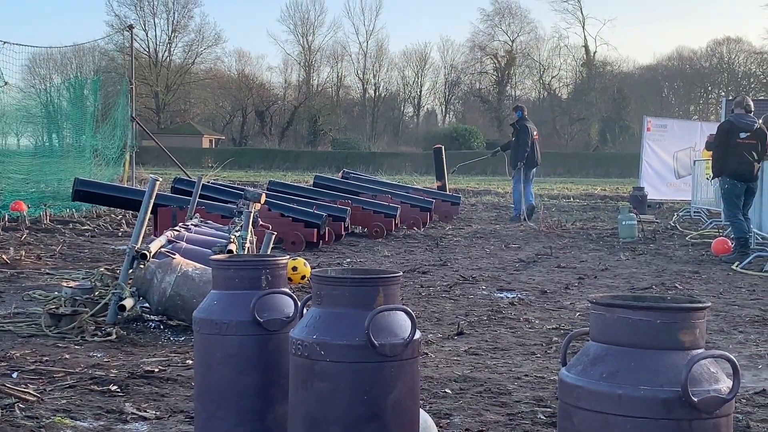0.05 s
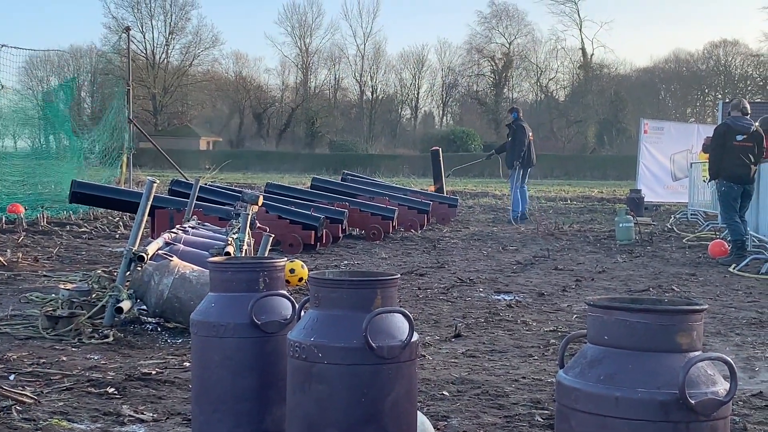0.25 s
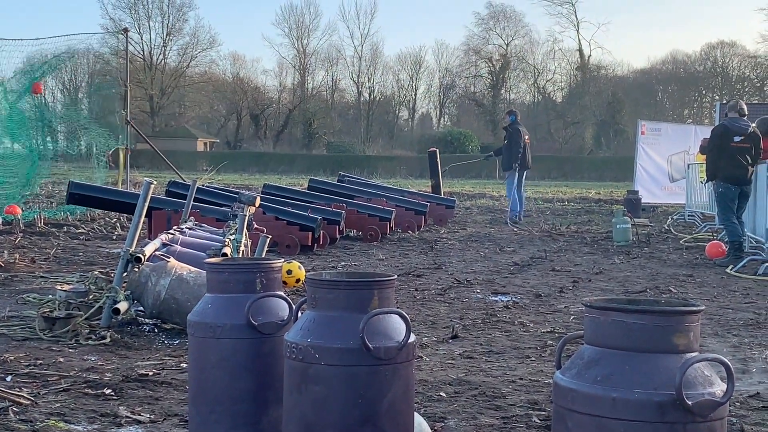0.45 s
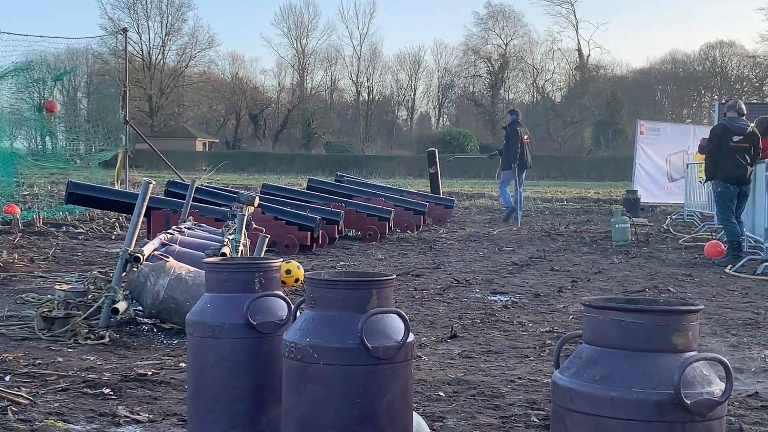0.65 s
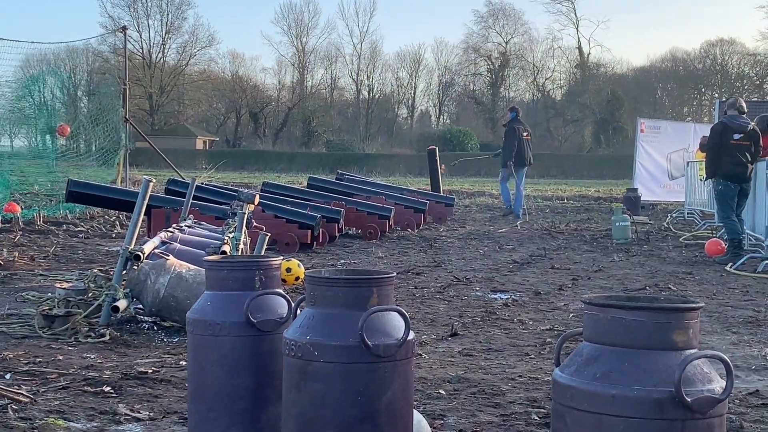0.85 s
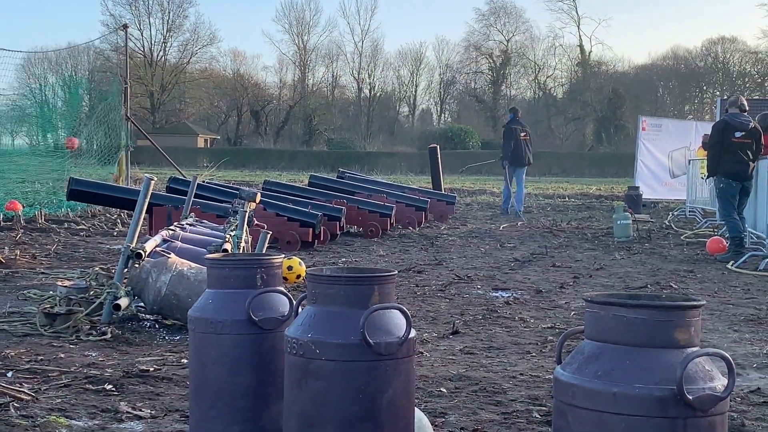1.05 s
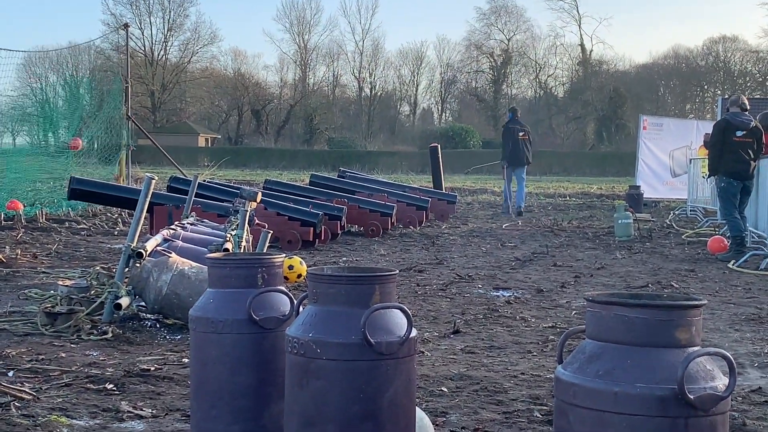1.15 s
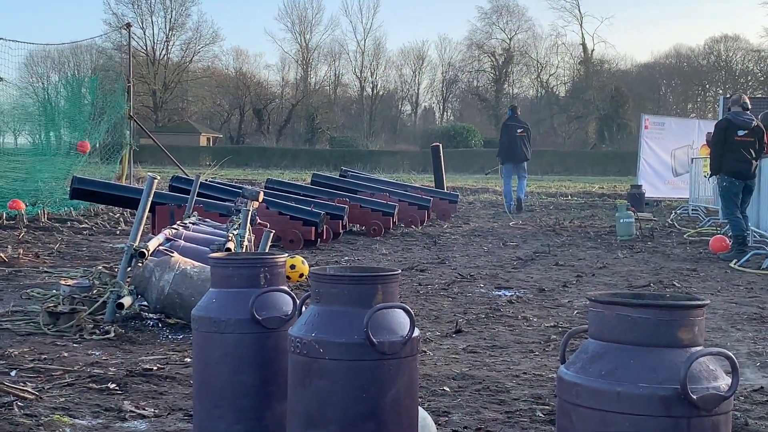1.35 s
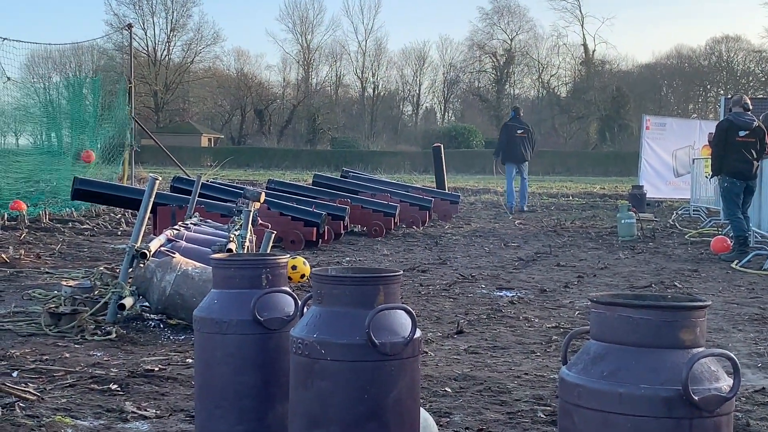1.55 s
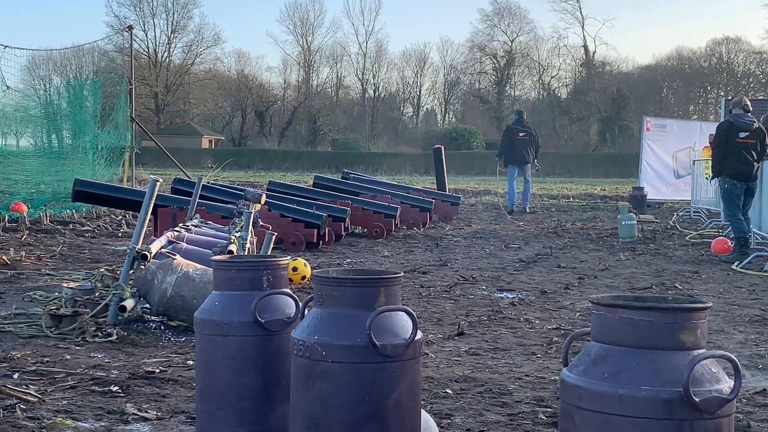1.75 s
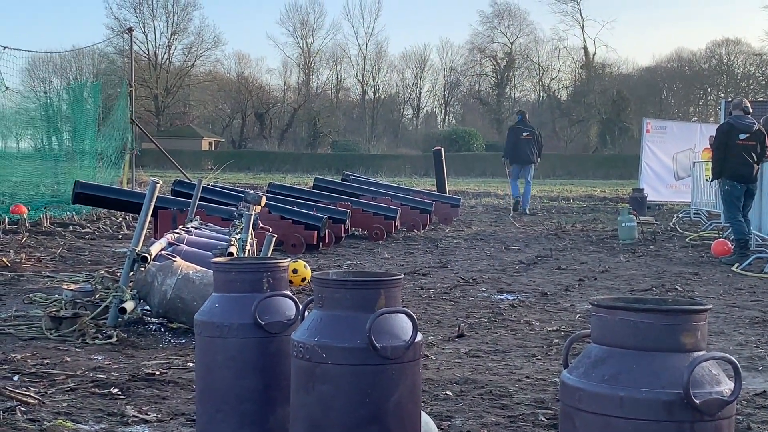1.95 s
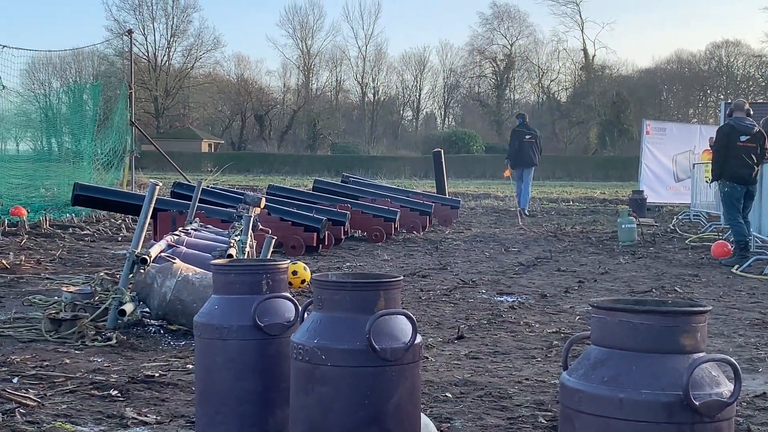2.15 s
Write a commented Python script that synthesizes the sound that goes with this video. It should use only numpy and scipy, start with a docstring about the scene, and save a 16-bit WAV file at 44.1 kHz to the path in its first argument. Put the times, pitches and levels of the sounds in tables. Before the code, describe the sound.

One sharp, deep carbide cannon blast, followed by echoes and a fading low rumble.

```python
"""A carbide cannon in an open field, heard on a stereo pair. A distant bird whistles faintly; then a
brief swell runs into a sharp crack, a boom that sweeps down and a short ring of the steel barrel. The
blast overloads the recorder. Nearby objects, then far walls, throw the boom back, one with a hollow
knock, while stands of bare trees scatter the crack into a hiss. A low rumble rolls away, and the bird
whistles once more over the low background of the field."""
import sys
import numpy as np
from scipy import signal
from scipy.fft import rfft, irfft, next_fast_len
from scipy.io import wavfile
from scipy.ndimage import uniform_filter1d, map_coordinates

SR = 44100
rng = np.random.default_rng(int(sys.argv[2]) if len(sys.argv) > 2 else 0)


def master_out(mix):
    """Clip the mix to full scale and print it as 16-bit PCM to the path in sys.argv[1]."""
    frames = np.transpose(np.atleast_2d(mix))
    ceiling = np.clip(frames, -1, 1)
    pcm = np.round(ceiling * 32767).astype(np.int16)
    wavfile.write(sys.argv[1], SR, pcm)


N = 97020
SHOT_S = .2168

# Spectrum of the muzzle blast (frequency [Hz], relative level [dB])
BLAST_SPECTRUM = [(20, -51), (45, -9.5), (110, 9.5), (190, 5.5), (400, -7.5), (750, -15), (1400, -20.5),
                  (3000, -48.5), (8000, -66.5)]

def blast_wave(start, cut_hz=None, bass_lag_s=.0117, knee_hz=132.5):
    """One pressure pulse whose bass trails behind the front; echoes lose the top above cut_hz."""
    hz = np.fft.rfftfreq(2 * N, 1 / SR)
    trail = bass_lag_s * knee_hz * np.arctan(hz / knee_hz)
    wave = causal(amp(along(BLAST_SPECTRUM, hz))) * np.exp(-2j * np.pi * (trail + hz * start))
    dull = 1 if cut_hz is None else causal((1 + (hz / cut_hz) ** 4) ** -.5)
    return irfft(wave * dull)[:N] / np.abs(irfft(wave)).max()


# Spectrum of the swell just ahead of the crack (frequency [Hz], relative level [dB])
SWELL_SPECTRUM = [(50, -18.5), (150, -3.5), (450, 2.5), (900, -9.5), (2000, -15.5), (7000, -11.5),
                  (9000, -31.5), (16000, -47.5)]
# Modes of the steel barrel (frequency [Hz], level [dB], t60 [s])
BARREL_MODES = [(238.2, -14.5, 0.41), (394.8, -8.5, 0.15), (447, -16.5, .27), (500.4, -19.5, 0.18),
                (534, -22, .17), (632, -27.5, .22), (708.5, -32, .21), (892, -18, 0.15),
                (1125, -25.5, 0.16), (1260, -27.5, .13), (1354, -24, 0.046), (1572, -35, .13)]

def cannon(swell_db_per_s=1899, boom_delay_s=.002, mic_spread_s=.00033):
    """A brief swell leads into the crack; then come the boom and the ring of the barrel."""
    t, lead = since(SHOT_S), np.maximum(SHOT_S - since(0), 0)
    swell = (lead > 0) * amp(-17 - swell_db_per_s * lead) * rush(SWELL_SPECTRUM, YARD_LIKENESS)
    boom = placed(amp(-3) * blast_wave(SHOT_S + boom_delay_s), lag_ms=1)
    ring = 0
    for hz, db, t60 in BARREL_MODES:
        arrival = mic_spread_s * rng.standard_normal((2, 1))
        ring = ring + amp(db - 60 * t / t60) * np.sin(2 * np.pi * hz * (t - arrival))
    return swell + boom + panned(ring, db=3) * attack(t, rise_s=.0027)


# The direct crack and its returns (delay [s], relative level [dB])
CRACK_ARRIVALS = [(0, 1.5), (.0056, -11), (.0088, -11), (0.02, -12), (0.389, -32.5)]
# Spectrum of the shock front (frequency [Hz], relative level [dB])
CRACK_SPECTRUM = [(300, 1.5), (1100, 1.5), (2200, -4.5), (4000, -5), (6500, -7), (8800, -10.5),
                  (11000, -10), (14000, -19), (16000, -19)]
# The crack across the pair (frequency [Hz], left-right likeness [0-1])
CRACK_LIKENESS = [(300, 0.778), (10000, 0.2)]

def cracks(t60=.00624):
    """The shock front slaps the microphones, then comes back from hard surfaces."""
    total = 0
    for delay, db in CRACK_ARRIVALS:
        t = since(SHOT_S + delay)
        slap = (t > 0) * amp(db - 4.5 - 60 * t / t60)
        total = total + slap * rush(CRACK_SPECTRUM, CRACK_LIKENESS, lag_ms=-.15)
    return total


# Spectrum of the close scatter (frequency [Hz], relative level [dB])
YARD_SPECTRUM = [(25, -26.5), (60, -7), (150, -4), (330, -6.5), (550, -10.5), (800, -14), (1400, -20.5),
                 (2300, -25), (4000, -27), (6800, -28), (8600, -35.5), (11000, -25), (16000, -40)]
# Its decay (frequency [Hz], t60 [s])
YARD_DECAY = [(60, 0.28), (300, 0.54), (1000, 0.17), (4000, 0.25), (10000, 0.21), (16000, 0.13)]
# Close sound across the pair (frequency [Hz], left-right likeness [0-1])
YARD_LIKENESS = [(60, 0.78), (200, .9), (600, 0.13), (1500, .2), (6000, 0.054)]

def yard():
    """Cannons and churns close by throw dense scatter right behind the blast."""
    wash = fading(rush(YARD_SPECTRUM, YARD_LIKENESS), lambda hz: 60 / along(YARD_DECAY, hz))
    return amp(-14) * wash * attack(since(SHOT_S), rise_s=.0027)


# Returns of the boom, near to far (time [s], gain [dB], low-pass [Hz], right microphone lag [ms])
BOOM_ECHOES = [(0.2203, -5, 470, -0.18), (0.23, 7, 55.6, 0.029), (0.2351, -18, 400, .1),
               (0.2551, -13, 266, 0.12), (0.268, -22, 354, 0.06), (0.2795, -10.5, 344, -0.64),
               (.291, -4.5, 403, -0.46), (0.2999, -5, 470, -0.76), (0.3179, 6, 74, -0.84),
               (0.3301, 8.3, 36, -0.88), (0.3774, -16.5, 237, -0.81), (.3992, -4.5, 84, -0.24),
               (.527, -21, 202, -0.54), (0.606, -4, 72.5, -0.15), (0.6146, -9, 78, -0.53),
               (.659, -23, 295, -0.096), (0.747, -21.5, 106, -.3), (0.84, -28, 110.6, -0.34),
               (.929, -29.5, 280, 0.53), (0.951, -32.5, 455, 0.54), (.973, -34, 420, .24),
               (1.05, -26.5, 96, -0.15), (1.092, -29.5, 204, -0.44), (1.123, -28, 160, -0.5),
               (1.189, -29.5, 170, -0.12), (1.227, -28.5, 150, -0.017), (1.368, -25, 74, -0.031),
               (1.396, -29.5, 98.4, 0), (1.525, -28, 106, .21)]

def echoes():
    """Nearby objects and far walls return dull copies of the boom, each from its own side."""
    return sum(placed(amp(db) * blast_wave(s, cut_hz), lag) for s, db, cut_hz, lag in BOOM_ECHOES)


# Modes of the far knock (frequency [Hz], level [dB], t60 [s])
KNOCK_MODES = [(474, -23.5, 0.033), (896, -24.5, 0.042), (1370, -42, 0.072)]

def knock(start_s=.605):
    """A short, hollow ring arrives with the strongest far echo."""
    t = since(start_s)
    ring = sum(amp(db - 60 * t / t60) * np.sin(2 * np.pi * hz * t) for hz, db, t60 in KNOCK_MODES)
    return placed(ring * attack(t, rise_s=.004), lag_ms=-.21)


# Fences, hedges and trees, near to far
# (time [s], rise [s], hold [s], t60 [s], level [dB], trunk gain [dB], right microphone lag [ms])
STANDS = [(0.283, 0.01, 0.019, 0.2, -35, 11, -0.42), (0.356, 0.021, 0.067, 0.44, -53, 11.5, -0.285),
          (0.484, 0.017, 0.185, 0.47, -48, 4, -0.29), (0.599, 0.0014, 0.004, 0.12, -42, 3.5, 0.07),
          (0.606, 0.029, 0.049, 0.17, -46.5, -7.5, -0.29), (.72, 0.055, 0.11, 0.33, -65.5, 9, -0.17),
          (0.897, 0.038, 0.017, 0.9, -44, 2.5, 0.45), (.92, 0.12, 0.23, 2.95, -50.5, -2, 0.4),
          (1.33, 0.054, 0.17, 0.42, -57, -8.5, 0.28)]
# Hiss off the twigs (frequency [Hz], relative level [dB])
TWIG_SPECTRUM = [(200, -35), (700, -2.5), (1300, 4), (2100, 3), (4000, -1), (7000, -6.5), (8600, -17),
                 (11000, -5), (13000, -34), (16000, -32)]
# Low-mid body off the trunks (frequency [Hz], relative level [dB])
TRUNK_SPECTRUM = [(60, -13.5), (150, 2.5), (230, -5), (330, -6), (500, -11), (900, -13.5), (2000, -39)]
# Distant sound across the pair (frequency [Hz], left-right likeness [0-1])
FIELD_LIKENESS = [(60, 1), (200, 0.87), (500, 0.74), (1800, 0.57), (4000, 0.128), (9000, 0.44)]

def thickets(air_db_per_s=12.5):
    """Each stand returns a swell of hiss; the air dulls the farther ones."""
    total = 0
    for start, rise, hold, t60, db, trunk_db, lag in STANDS:
        swell = np.minimum(since(start) / rise, 1) * amp(db - 60 * since(start + rise + hold) / t60)
        twigs = amp(1.5) * rush(TWIG_SPECTRUM, FIELD_LIKENESS, lag)
        trunks = amp(trunk_db) * rush(TRUNK_SPECTRUM, FIELD_LIKENESS, lag)
        total = total + swell * (twigs + trunks)
    return fading(total, lambda hz: air_db_per_s * (hz / 4000) ** 1.12)


# Course of the far rumble (time [s], relative level [dB])
RUMBLE_LEVELS = [(.36, -26), (.5, -29), (.59, -31.5), (.69, -28.5), (.881, -41.5), (1.001, -43),
                 (1.252, -40.5), (1.601, -43), (1.9, -51), (2.2, -56)]
# Its spectrum (frequency [Hz], relative level [dB])
RUMBLE_SPECTRUM = [(20, -38.5), (40, -17), (65, 3.5), (130, -3.5), (200, -8.5), (320, -26.5), (700, -37.5),
                   (2000, -79)]
# Its extra loss on the way (frequency [Hz], loss [dB/s])
RUMBLE_LOSS = [(70, 0.6), (130, 2.5), (250, 9.5)]

def rumble():
    """Countless far echoes merge into an even, low roll that deepens as it travels."""
    times, level_db = np.transpose(RUMBLE_LEVELS)
    roll = rush(RUMBLE_SPECTRUM, FIELD_LIKENESS, lag_ms=-.32)
    power = np.abs(uniform_filter1d(np.mean(roll ** 2, axis=0), size=3000))
    even = roll / np.sqrt(power + 1e-6)
    deepening = fading(even, lambda hz: along(RUMBLE_LOSS, hz), patchy_db=.2)
    onset = np.minimum(since(SHOT_S) / (times[0] - SHOT_S), 1) ** 2
    return deepening * onset * amp(np.interp(since(0), times, level_db) + 1)


# Whistles of a distant bird (time [s], length [s], pitch [Hz], level [dB])
BIRD_NOTES = [(.02, .2, 6600, -90), (1.768, .25, 6350, -91)]

def bird(waver_hz=150, wavers_per_s=400):
    """Faint, high notes from far off, each wavering around one pitch."""
    waver = map_coordinates(rng.standard_normal(N), [since(0) * wavers_per_s])
    total = 0
    for start, length, hz, db in BIRD_NOTES:
        arch = np.abs(np.sin(np.pi * np.minimum(since(start) / length, 1)))
        total = total + amp(db) * arch * np.sin(2 * np.pi * np.cumsum(hz + waver_hz * waver) / SR)
    return total


# Background of the open field (frequency [Hz], relative level [dB])
AMBIENCE_SPECTRUM = [(20, -21), (55, 5), (130, -1.5), (250, -13), (450, -13.5), (650, -22.5), (1200, -23.5),
                     (2000, -35), (3100, -29), (5000, -49.5), (8000, -57), (11000, -57.5), (16000, -72)]

def ambience():
    """A steady, low rush around the microphones."""
    return amp(-57) * rush(AMBIENCE_SPECTRUM, FIELD_LIKENESS)


def amp(db):
    """Decibels to gain."""
    return 10 ** (np.asarray(db) / 20)


def unit(x):
    """Scale to rms 1."""
    return x / np.sqrt(np.mean(x ** 2) + 1e-20)


def along(points, hz):
    """Read (frequency, value) points on a log axis."""
    freqs, values = np.transpose(points)
    return np.interp(np.log(hz + 1), np.log(freqs + 1), values)


def since(start):
    """Seconds since start, zero before it."""
    return np.maximum(np.arange(N) / SR - start, 0)


def attack(t, rise_s):
    """An exponential rise from 0 to 1."""
    return 1 - np.exp(-t / rise_s)


def filtered(x, response):
    """Pass x through a complex response of frequency."""
    size = next_fast_len(N + SR // 2)
    return irfft(rfft(x, size) * response(np.fft.rfftfreq(size, 1 / SR)), size)[..., :N]


def causal(gain):
    """The minimum-phase response with this gain."""
    cepstrum = irfft(np.log(np.maximum(gain, 1e-6)))
    half = len(cepstrum) // 2
    return np.exp(rfft(np.r_[cepstrum[0], 2 * cepstrum[1:half], np.zeros(half)]))


def placed(x, lag_ms):
    """A pair in which the right microphone hears x later by lag_ms."""
    return filtered(x, lambda hz: np.exp(1j * np.pi * hz * lag_ms / 1000 * np.array([[1], [-1]])))


def panned(pair, db):
    """Raise the left side and lower the right by db."""
    return pair * amp([[db], [-db]])


def rush(spectrum, likeness, lag_ms=0):
    """Coloured stereo noise of rms 1 from one direction."""
    def mid_side_gains(hz):
        width = np.arccos(np.clip(along(likeness, hz), -1, 1)) / 2
        return amp(along(spectrum, hz)) * [np.cos(width), np.sin(width)]
    mid, side = filtered(rng.standard_normal((2, N)), mid_side_gains)
    return unit(placed(np.array([mid + side, mid - side]), lag_ms))


def fading(x, db_per_s, patchy_db=2.5):
    """Patchy scatter: each frequency loses its own number of dB per second after the shot."""
    hz, t, bins = signal.stft(x, SR, nperseg=512)
    patches = uniform_filter1d(rng.standard_normal(bins.shape[1:]), size=3, axis=0)
    patches = unit(uniform_filter1d(patches, size=5, axis=1))
    loss_db = db_per_s(hz)[:, None] * np.maximum(t - SHOT_S, 0)
    return signal.istft(bins * amp(patchy_db * patches - loss_db), SR)[1][:, :N]


def scene():
    """At the microphones: the shot and its answers over the low background of the field."""
    field = echoes() + knock() + thickets() + rumble()
    return cracks() + cannon() + yard() + panned(field, db=-.44) + bird() + ambience()


def record(dry, hardness=3, top_hz=16400):
    """The recorder rounds off the loudest peaks and keeps nothing above its band limit."""
    clipped = dry / (1 + np.abs(dry) ** hardness) ** (1 / hardness)
    return filtered(clipped, lambda hz: 1 / (1 + (hz / top_hz) ** 70))


dry = scene()
out = record(dry)
master_out(out)
```